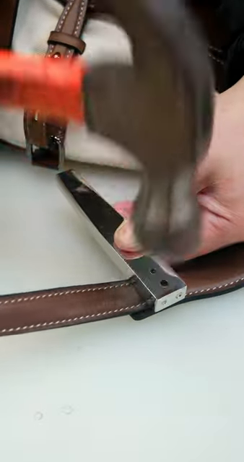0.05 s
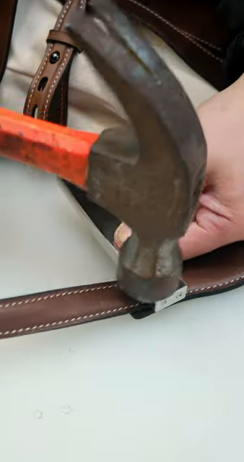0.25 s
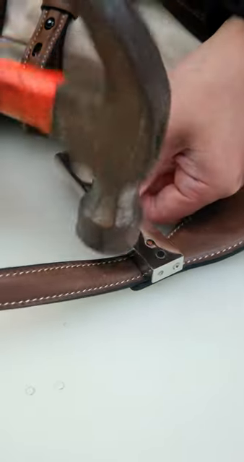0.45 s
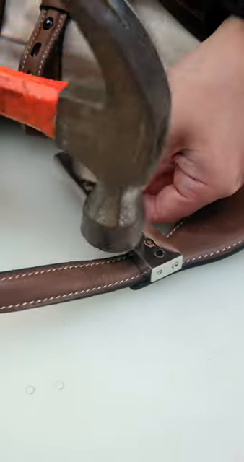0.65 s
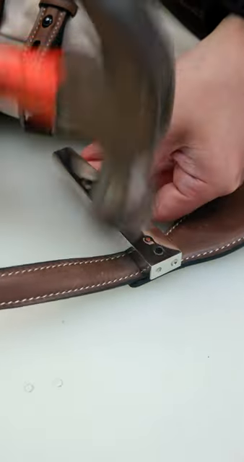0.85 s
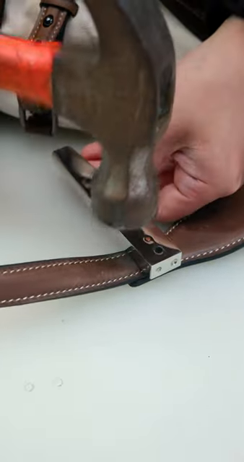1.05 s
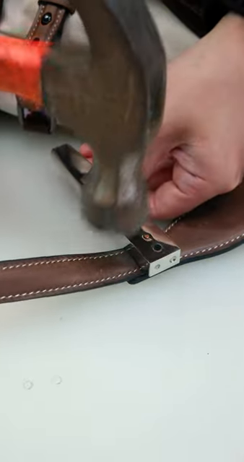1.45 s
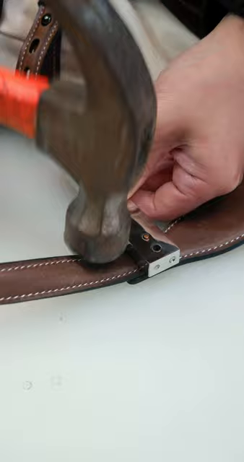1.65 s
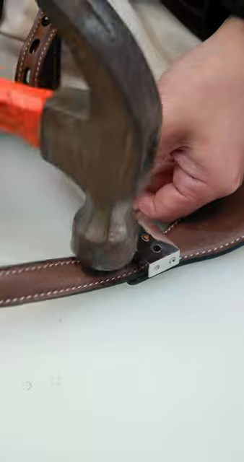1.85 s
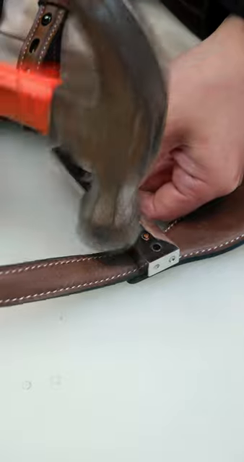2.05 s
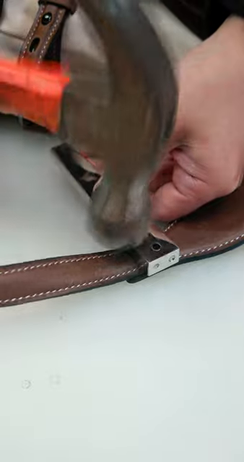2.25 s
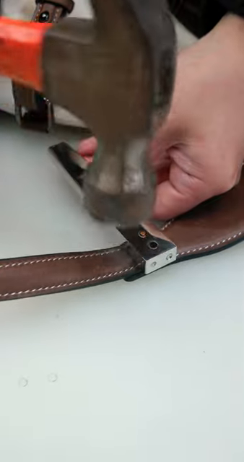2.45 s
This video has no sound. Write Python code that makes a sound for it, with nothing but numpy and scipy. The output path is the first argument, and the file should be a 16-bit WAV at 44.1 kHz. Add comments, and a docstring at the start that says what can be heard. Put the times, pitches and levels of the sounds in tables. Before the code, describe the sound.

A hammer taps a small metal fitting in quick, regular blows with a brief ring.

```python
"""Hammering a fitting onto a strap

A steel hammer taps a small metal fitting shut on a leather strap, about four blows a second, on a table
in a small room, heard in stereo. Each blow is a crack, a brief ring of the metal and a thud of the table
top; the ring changes as the fitting settles. The last lands dull and heavy, with a soft rebound.
At the start the room is still dying away from an earlier blow."""
import sys
import numpy as np
from scipy import signal
from scipy.fft import rfft, irfft
from scipy.io import wavfile
from scipy.ndimage import uniform_filter1d

SR = 44100
rng = np.random.default_rng(int(sys.argv[2]) if len(sys.argv) > 2 else 0)


def transcribe(signal):
    """Save signal, clipped to [-1, 1], as a 16-bit WAV file at the path in sys.argv[1]."""
    frames = np.atleast_2d(signal).T
    limited = np.clip(frames, -1, 1)
    pcm = np.round(limited * 32767).astype(np.int16)
    wavfile.write(sys.argv[1], SR, pcm)


N = 114660
t = np.arange(SR // 2) / SR  # the time that one blow lasts [s]
SIDE = np.array([[.5], [-.5]])  # splits a left-right difference between the channels


def amp(db):
    """Decibels to gain."""
    return 10 ** (np.asarray(db) / 20)


def curve_at(points, hz):
    """A curve interpolated over log frequency."""
    freqs, values = np.transpose(points)
    return np.interp(np.log(hz + 1), np.log(freqs), values)


def fade(time, t60):
    """Exponential decay, 60 dB down after t60."""
    return np.exp(-np.log(1000) * time / t60)


def add(mix, start_s, sound):
    """Mixes in a stereo sound, which may begin before time zero."""
    at = round(start_s * SR)
    sound = sound[:, max(-at, 0):]
    span = mix[:, max(at, 0):][:, :sound.shape[1]]
    span += sound[:, :span.shape[1]]


def colour(x, points):
    """Causal filter with the given dB curve."""
    size = x.shape[-1]
    log_gain = np.log(amp(curve_at(points, abs(np.fft.fftfreq(size, 1 / SR)))))
    response = np.exp(np.conj(signal.hilbert(log_gain)))[:size // 2 + 1]
    return irfft(rfft(x) * response, size)


def pair(a, b, likeness):
    """Two channels of given likeness from two unrelated signals."""
    angle = np.arccos(np.clip(likeness, -1, 1)) / 2
    mid, side = a * np.cos(angle), b * np.sin(angle)
    return np.array([mid + side, mid - side])


# Background of the small room: (frequency [Hz], relative level [dB])
ROOM_TONE = [(25, -5.5), (60, 6), (110, -2.5), (350, -3.5), (800, -15.5), (3500, -10), (6000, -22),
             (15000, -26)]


def room_tone(level_db=-72.5):
    """Faint steady room noise, the same at both microphones."""
    noise = colour(pair(*rng.standard_normal((2, N)), likeness=1), ROOM_TONE)
    return amp(level_db) * noise / noise.std()


# Spectrum of the hammer's impact: (frequency [Hz], relative level [dB])
CRACK_SPECTRUM = [(60, -18), (300, 1.5), (1200, 0.5), (2400, -4.5), (3300, 3), (5500, -6), (7200, -5),
                  (9200, -6.5), (12000, -3.5), (14000, -24), (16500, -22.5)]


def crack():
    """Steel meets metal: a dense burst that is gone in a few milliseconds."""
    noise = pair(*rng.choice([-1., 1.], (2, len(t))), likeness=0.76)
    return amp(-24.5) * colour(noise * fade(t, t60=0.018), CRACK_SPECTRUM)


# Modes of the metal across the microphone pair: (tag, frequency [Hz], relative level [dB], t60 [s],
# left minus right [dB], left lag [rad]). The last three tags mark sets of edge modes, not pitch order.
METAL_MODES = [ ("clank", 1736, -28, 0.0043, -1, .2), ("clank", 1866, -26.5, 0.0066, -1, .3),
               ("clank", 3000, -34.5, 0.0021, -1, 0.54), ("thud", 5782, -71, .33, 0, .5),
               ("ping", 3907, -23.5, 0.017, -0.99, .5), ("clink", 4490, -20, 0.0095, -2.9, 0.88),
               ("zing", 8330, -36, 0.024, 1.5, 1.9), ("zing", 13215, -39, .026, 1, .8),
               ("zing", 11000, -70.5, 0.097, 0.83, .5), ("low", 12000, -23.5, 0.036, 0.9, 2.1),
               ("mid", 9970, -32.5, 0.032, 1, 1), ("mid", 10350, -41.5, 0.0071, 1, .9),
               ("top", 14000, -34.5, 0.00833, 1, 0.27), ("top", 12350, -31, .011, 1, .5), ]


def metal_ring(part_db, contact_s=0.00059):
    """Fitting and hammer head ring briefly, damped by the leather."""
    ring = np.zeros((2, len(t)))
    for part, hz, db, t60, pan_db, lag in METAL_MODES:
        if part not in part_db:
            continue
        detune = .003 * rng.standard_normal() * fade(t60, 0.26)  # short modes stray most in pitch
        tone = np.sin(2 * np.pi * hz * (1 + detune) * t - SIDE * lag)
        ring += amp(db + part_db[part] + SIDE * pan_db) * fade(t, t60) * tone
    return ring * (1 - np.exp(-t / contact_s))


# The room's lingering low boom (119 and 210 Hz), then the short modes of the table top:
# (part of the blow, frequency [Hz], relative level [dB], t60 [s])
TABLE_AND_ROOM_MODES = [ ("thud", 119, -68.5, .5), ("thud", 210, -60, 0.34), ("thud", 257.2, -44.5, 0.038),
                        ("thud", 331.6, -39, 0.031), ("body", 388, -51, 0.08), ("body", 456.4, -45.5, 0.04),
                        ("body", 590, -47, 0.051), ("knock", 685, -43.5, 0.032),
                        ("knock", 772.6, -39, 0.018), ("knock", 1049, -38.5, 0.012), ]


def thud_and_boom(part_db, push_s=0.0008, cushion_s=0.00034):
    """The blow pushes through the strap: the table top rings briefly and the room booms on."""
    push = amp(-43 + part_db["thud"]) * (1 - t / push_s) * np.exp(-t / push_s)
    ring = sum(amp(db + part_db[part]) * fade(t, t60) * np.cos(2 * np.pi * hz * t)
               for part, hz, db, t60 in TABLE_AND_ROOM_MODES)
    return push + (1 - np.exp(-t / cushion_s)) * ring


# Colour of the room's reverberation: (frequency [Hz], level [dB])
ROOM_COLOUR = [(60, -1), (110, 1.5), (200, -1), (350, -5), (600, -7), (1100, -5.5), (1900, -9),
               (2800, -1.5), (4000, -15.5), (4700, -10.5), (6000, -4.5), (8300, -9), (10000, -5.5),
               (12200, -7.5), (13200, -6.5), (14500, -14.5)]
# Decay of its late tail: (frequency [Hz], t60 [s])
ROOM_DECAY = [(100, 0.61), (300, 0.47), (800, 0.36), (2000, 0.38), (4500, 0.47), (9000, 0.5), (14000, 0.43)]
# How alike it reaches the two microphones: (frequency [Hz], likeness [0-1])
ROOM_STEREO = [(60, 1), (200, .96), (950, .9), (2400, .68), (6000, 0.041), (15000, 0.042)]


def reverb(direct, delay_s=0.0019, build_s=0.0046):
    """Early reflections off near walls and the table, then a diffuse tail dying band by band."""
    hz, time, bands = signal.stft(rng.standard_normal((2, len(t))), SR, nperseg=256)
    early = amp(8) * fade(time, t60=0.12)
    late = fade(time, curve_at(ROOM_DECAY, hz)[:, None])
    build = np.clip((t - delay_s) / build_s, 0, 1)
    tail = signal.istft(bands * np.hypot(late, early), SR, nperseg=256)[1][:, :len(t)]
    spectrum = rfft(tail * build, SR)
    power = abs(uniform_filter1d(abs(spectrum) ** 2, size=81, axis=1))
    flat = spectrum / np.sqrt(power + 1e-12)
    likeness = curve_at(ROOM_STEREO, np.fft.rfftfreq(SR, 1 / SR))
    stereo_tail = irfft(pair(*flat, likeness))[:, :len(t)]
    response = colour(stereo_tail * build, ROOM_COLOUR)
    return signal.fftconvolve(direct.mean(0)[None], response, axes=1)[:, :len(t)]


BLOW_GAIN_DB = 7.5  # shared by the blows and the rebound
# Blows at the table, each part with its own gain: (time [s], crack [dB], thud [dB], knock [dB],
# clank [dB], ping [dB], clink [dB], zing [dB], edge ring [dB], tag of the edge modes that ring).
# The tags pick about 10 kHz ("mid"), 12 kHz ("low") or 12.35-14 kHz ("top").
HAMMER_BLOWS = [ (-.075, -2, -6.5, -2.5, -12.5, -2, -5, 7.5, 7, "top"),
                (0.2408, -1.5, -6, -4.5, -16, -1.5, -9.5, 9.5, -8, "low"),
                (0.4074, -0.5, 0.5, -4, 7.5, 3, -6.5, 0.5, -9.5, "low"),
                (0.6462, -3, -1, -7, 3.5, 0.5, -1.5, 4, -4, "mid"),
                (0.8851, -3.5, 2.5, 2.5, 2.5, 2.5, -4.5, 4, -11, "mid"),
                (1.1206, 0, 4, -2, 1, -7, -0.5, 2.5, -1, "mid"),
                (1.3514, 0, 3, -0.5, -3.5, -8.5, 2, -6, -3, "mid"),
                (1.5795, -3, -2.5, 2, 3, -2, -1.5, -17, 4, "top"),
                (1.8331, -2, -2.5, 2.5, -2, -4, -2, -12.5, 3, "top"),
                (2.0765, -3.5, 1.5, -4.5, 2, 1.5, 1, 4.5, -9.5, "mid"),
                (2.2867, -2, 8, 12, 2, -4.5, -17, -3, -4.5, "mid"), ]


def blow(crack_db, thud_db, knock_db, clank_db, ping_db, clink_db, zing_db, edge_db, edge):
    """One blow; where it lands decides which high modes of the fitting's edge ring out."""
    body_db = 1.64 * thud_db  # a heavy blow presses the leather flat: the table's middle modes gain most
    part_db = {"thud": thud_db, "body": body_db, "knock": knock_db, "clank": clank_db,
               "ping": ping_db, "clink": clink_db, "zing": zing_db, edge: edge_db}
    direct = amp(crack_db) * crack() + metal_ring(part_db) + thud_and_boom(part_db)
    return amp(BLOW_GAIN_DB) * (direct + reverb(direct))


def rebound(rise_s=0.0057):
    """The hammer settles back on the leather: a soft, slow bump with no ring of metal."""
    swell = 1 - np.exp(-t / rise_s)
    thud = thud_and_boom({"thud": -7.5, "body": 8.5, "knock": 8.5})  # little reaches the lowest modes
    bump = np.tile(swell * thud, (2, 1))
    return amp(BLOW_GAIN_DB) * (bump + reverb(bump))


def scene():
    """The run of blows and the last rebound over the quiet room."""
    mix = room_tone()
    for start_s, *parts in HAMMER_BLOWS:
        add(mix, start_s, blow(*parts))
    add(mix, start_s=2.361, sound=rebound())
    return mix


# Balance of the microphone pair: (frequency [Hz], left minus right [dB])
MIC_BALANCE = [(40, -5.5), (120, 0), (300, -1), (1000, -1), (2500, -0.5), (4500, -0.5), (8000, 0.5),
               (14000, 1.5)]


def record(dry, low_cut_hz=151, high_cut_hz=16600, threshold_db=-89.5, range_db=11.5):
    """The microphones lose the bass; the recorder turns down faint bands and cuts the highest treble."""
    low_cut = signal.butter(2, low_cut_hz, "high", fs=SR, output="sos")
    hz, _, bands = signal.stft(signal.sosfilt(low_cut, dry), SR, nperseg=256)
    power = uniform_filter1d((abs(bands) ** 2).mean(0), size=33, axis=0)  # across wide bands
    power = uniform_filter1d(power, size=5, axis=1).clip(0)  # and over time
    faintness = 1 / (1 + (power / amp(threshold_db) ** 2) ** 2)
    cut_db = range_db * (0.5 + faintness)  # even loud bands lose half the range
    balance_db = SIDE[:, None] * curve_at(MIC_BALANCE, hz)[:, None]
    suppressed = signal.istft(bands * amp(balance_db - cut_db), nperseg=256)[1][:, :N]
    low_pass = signal.firwin(511, high_cut_hz, window=("kaiser", 9), fs=SR)
    return signal.oaconvolve(suppressed, low_pass[None], "same", axes=1)


dry = scene()
out = record(dry)
transcribe(out)
```